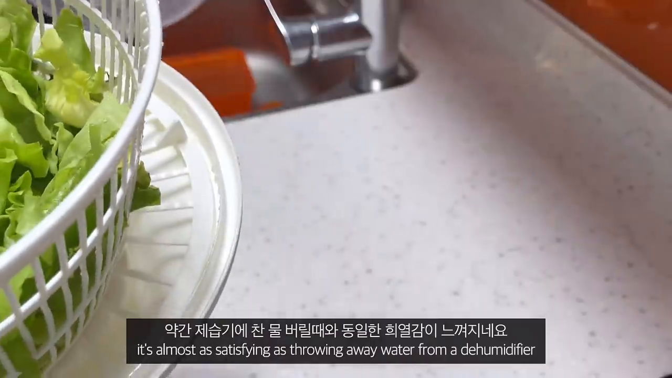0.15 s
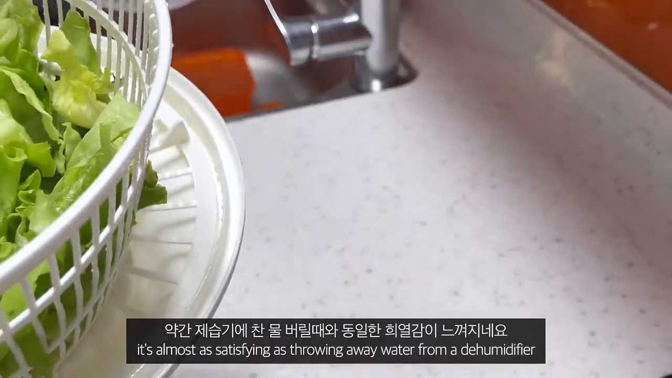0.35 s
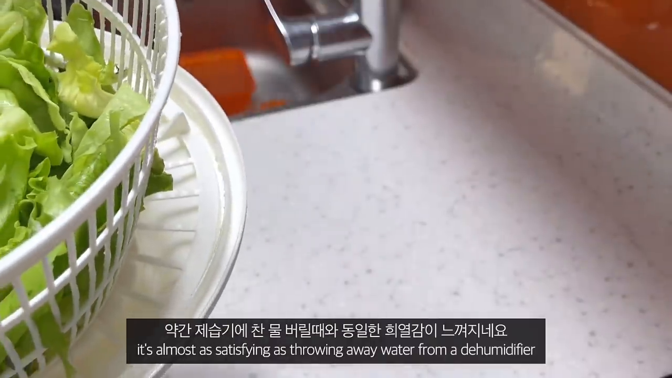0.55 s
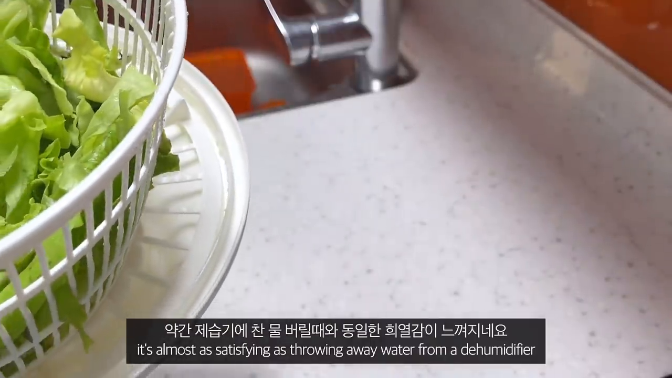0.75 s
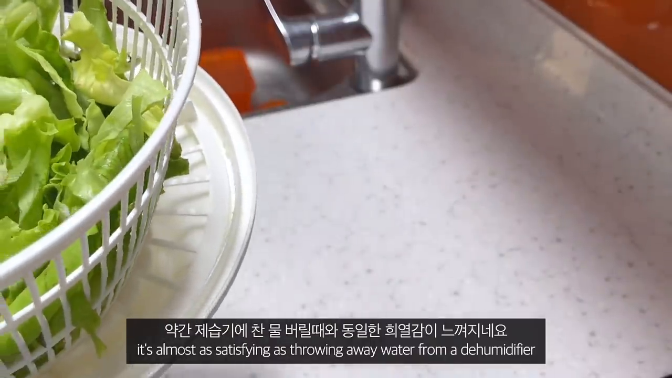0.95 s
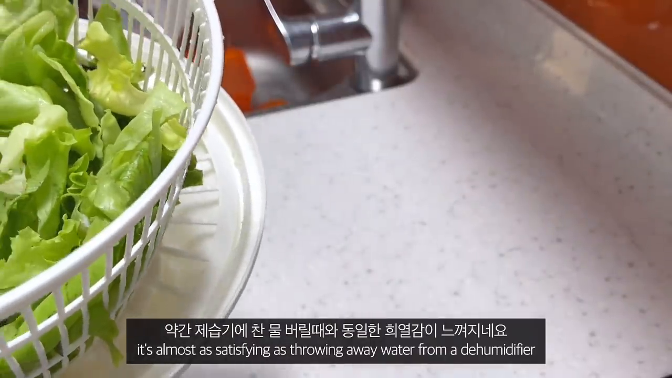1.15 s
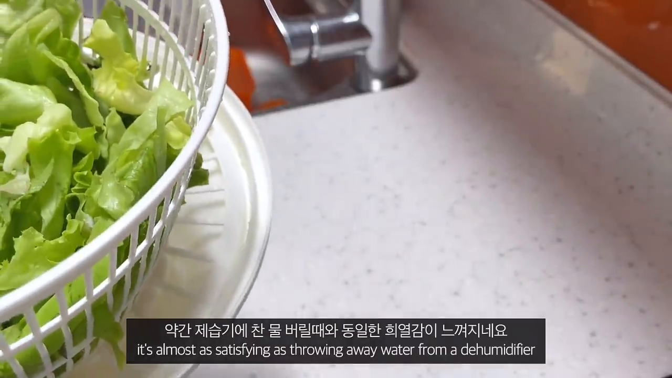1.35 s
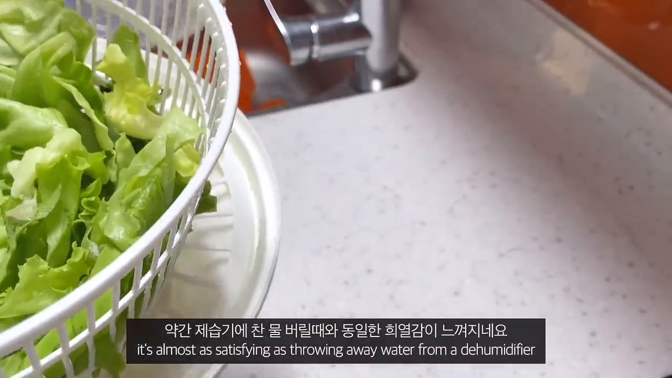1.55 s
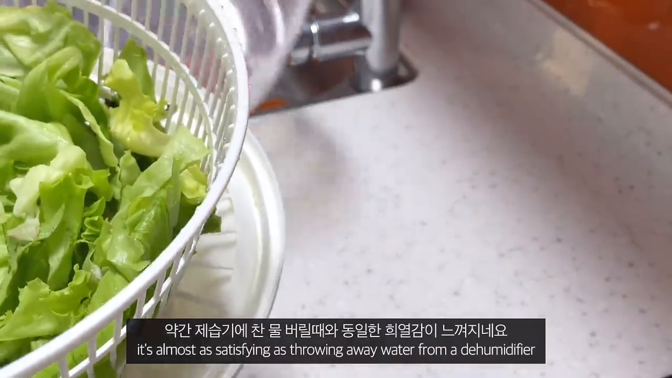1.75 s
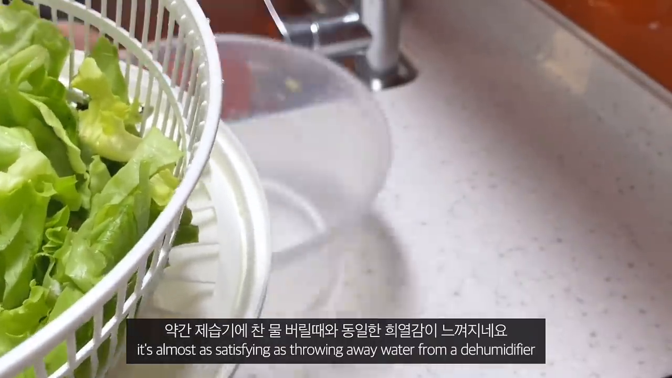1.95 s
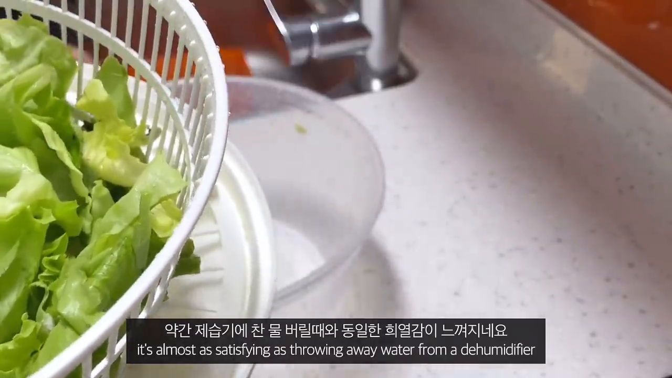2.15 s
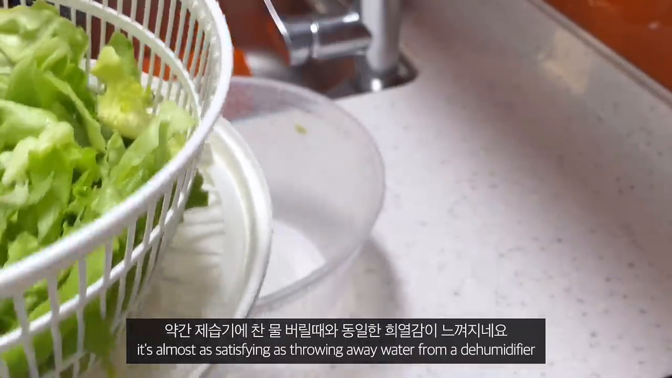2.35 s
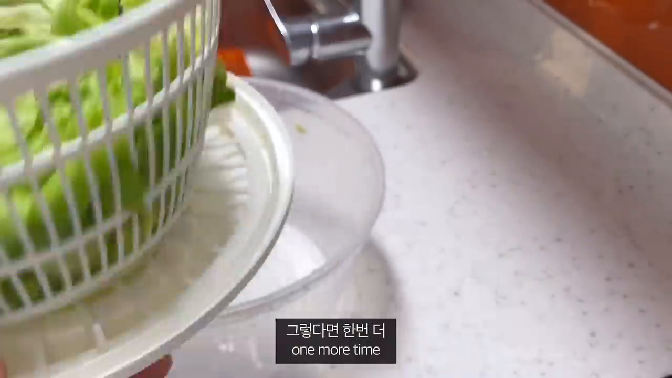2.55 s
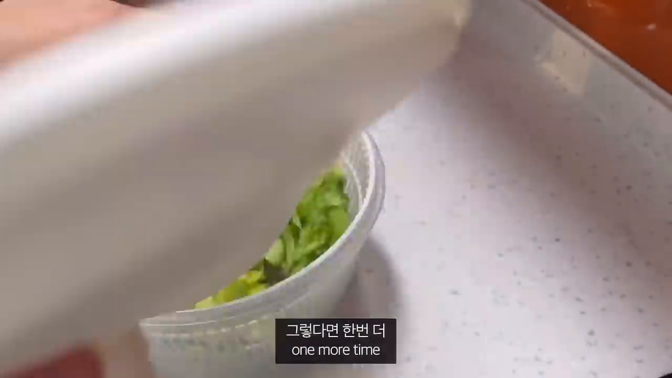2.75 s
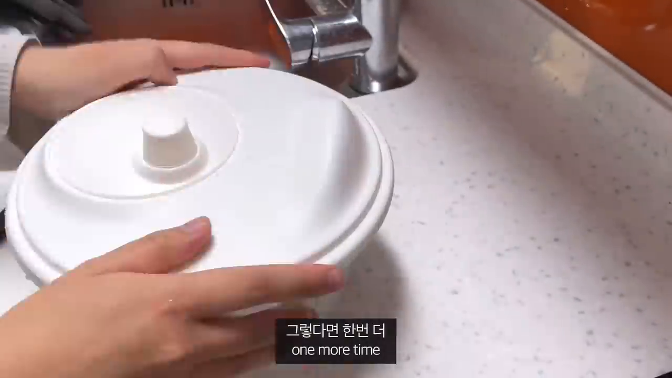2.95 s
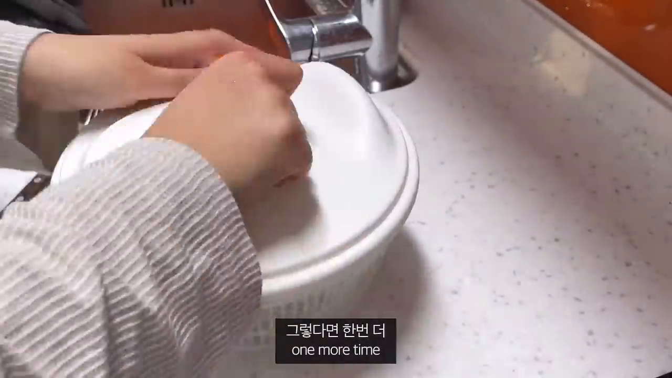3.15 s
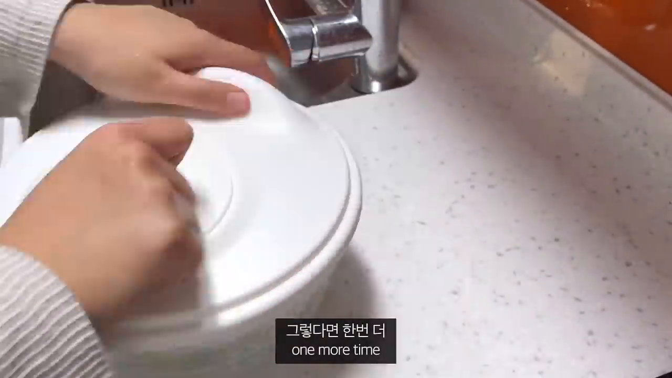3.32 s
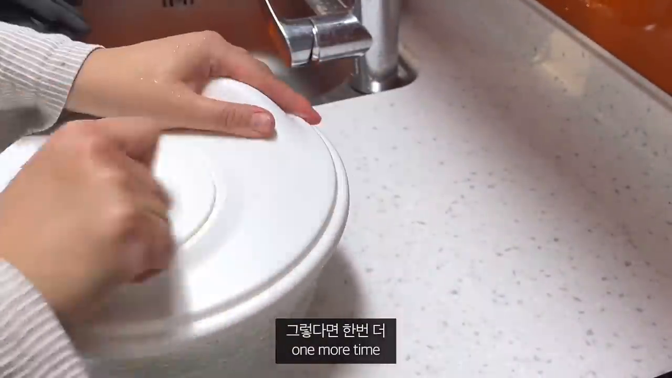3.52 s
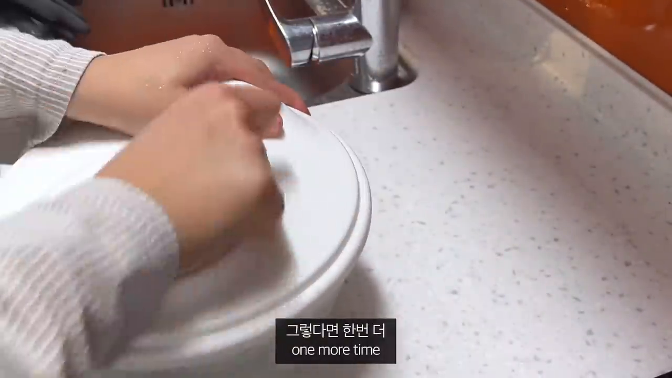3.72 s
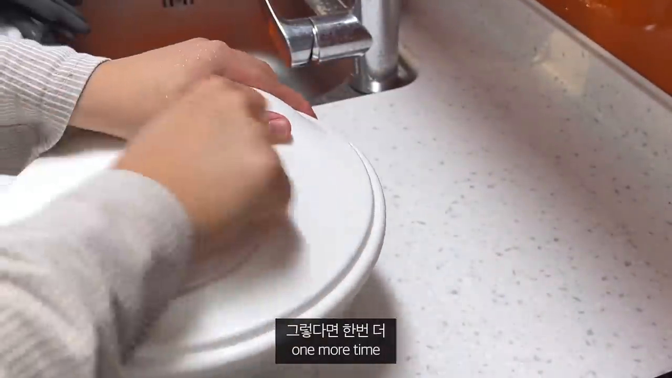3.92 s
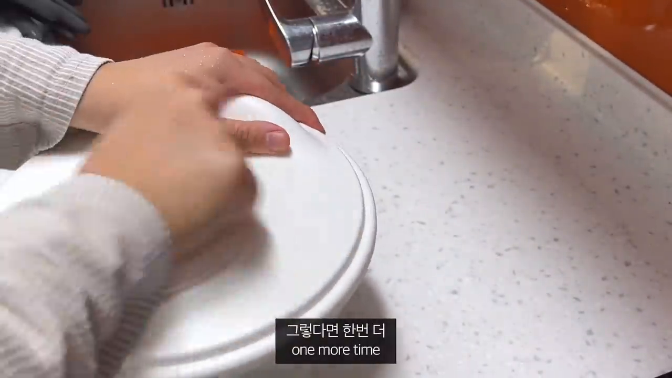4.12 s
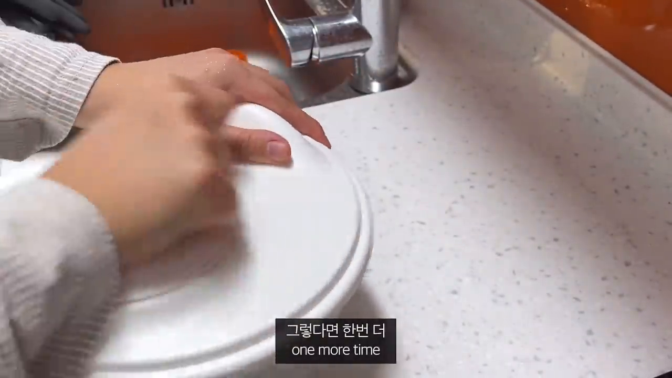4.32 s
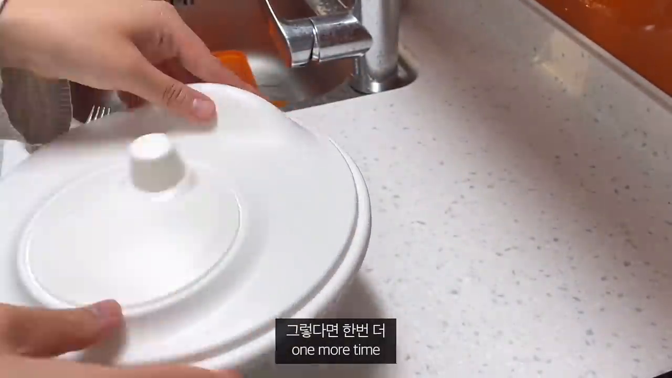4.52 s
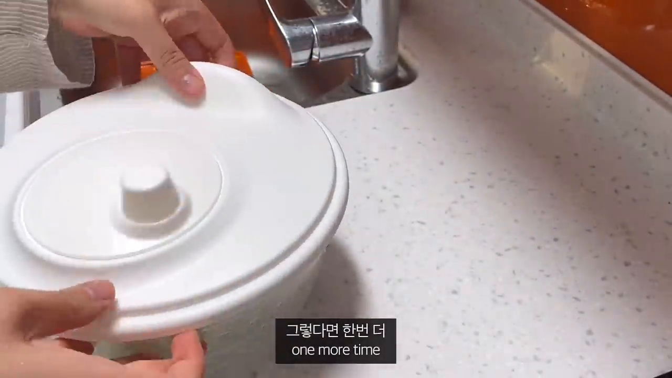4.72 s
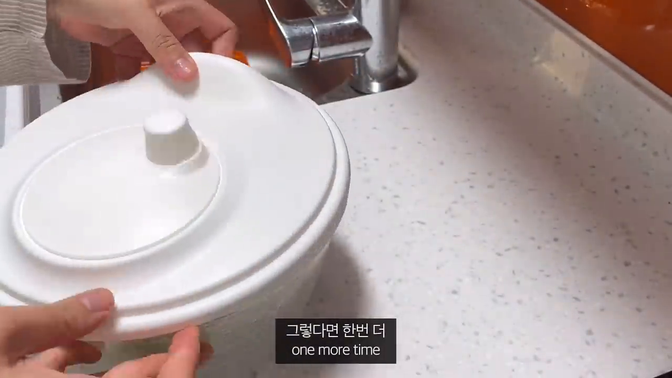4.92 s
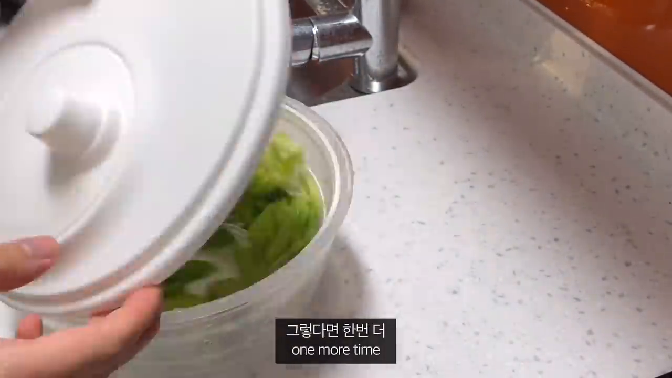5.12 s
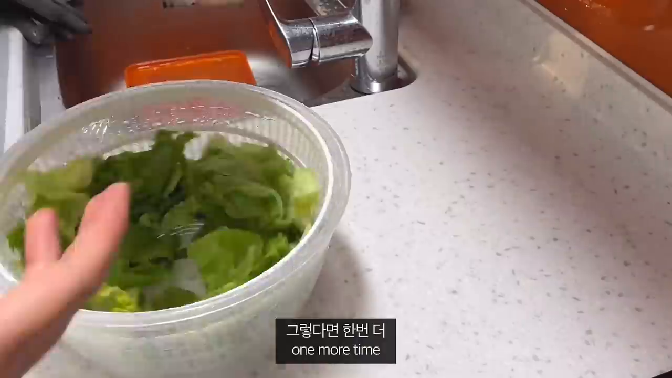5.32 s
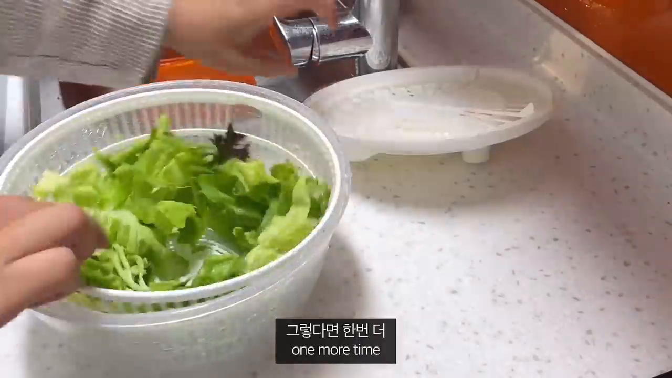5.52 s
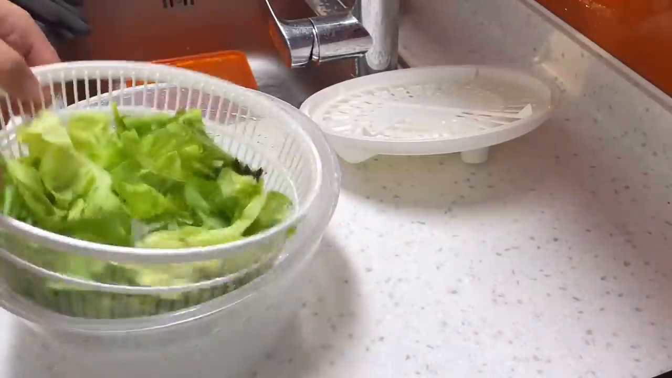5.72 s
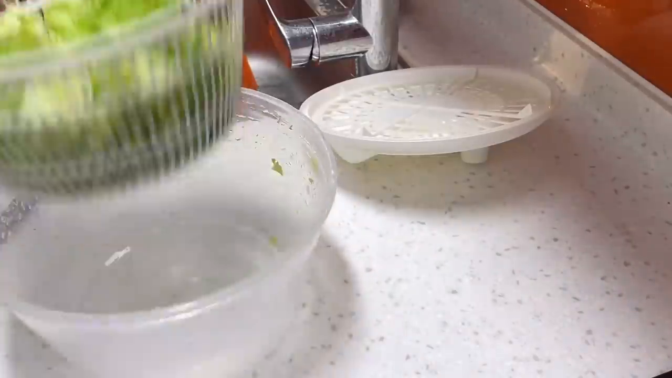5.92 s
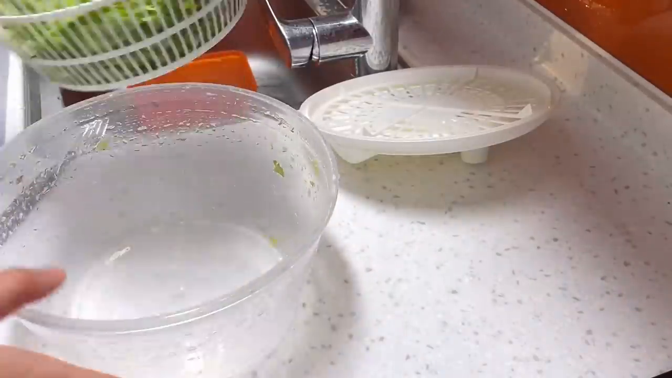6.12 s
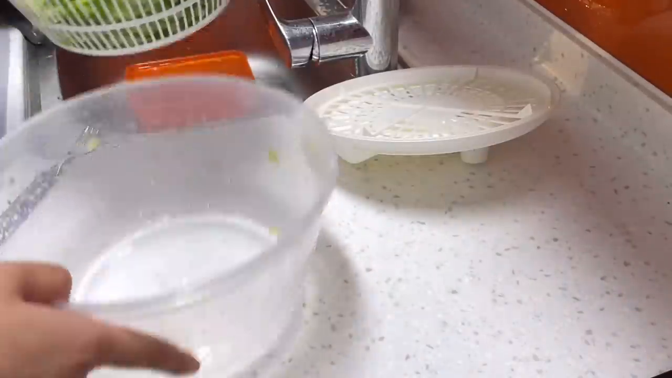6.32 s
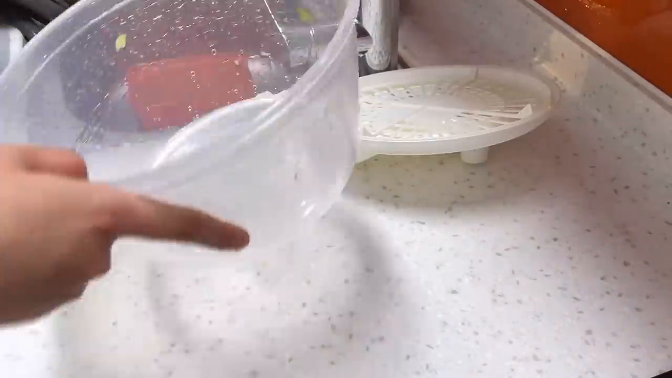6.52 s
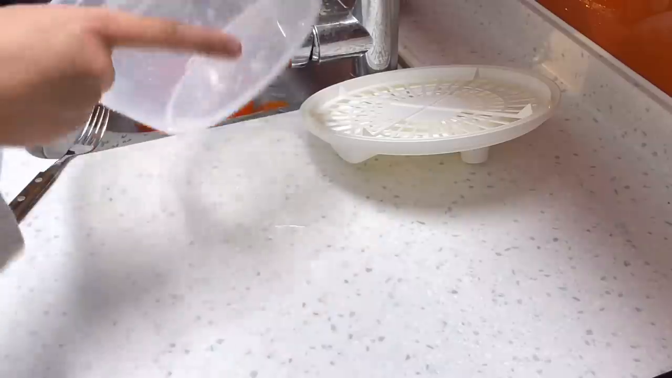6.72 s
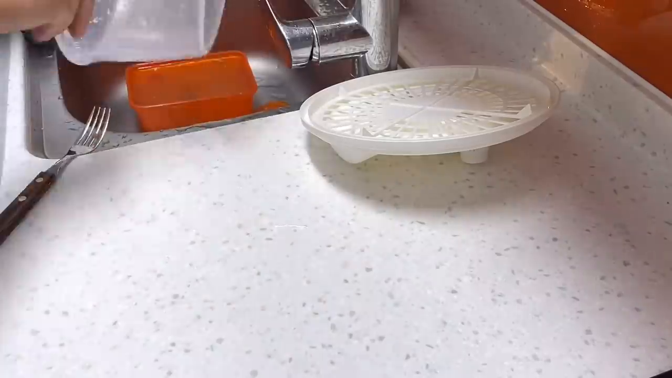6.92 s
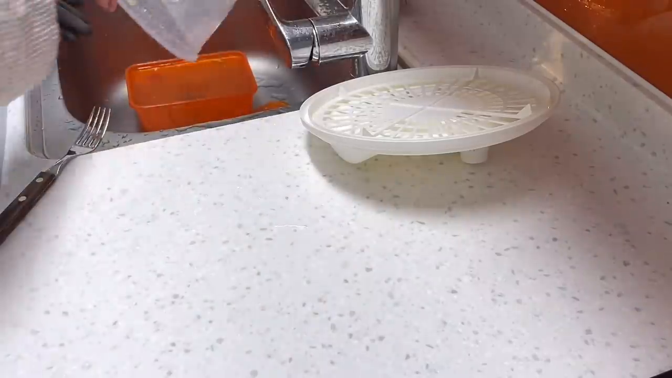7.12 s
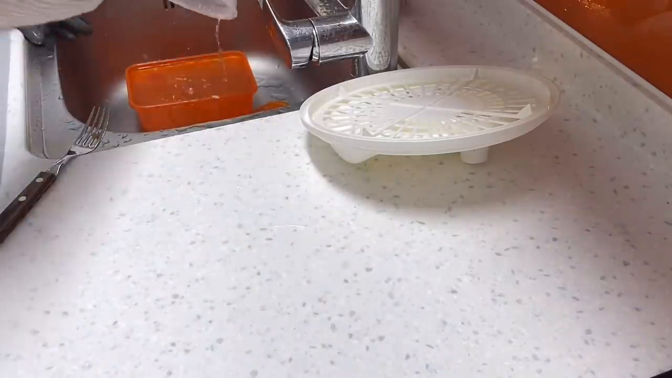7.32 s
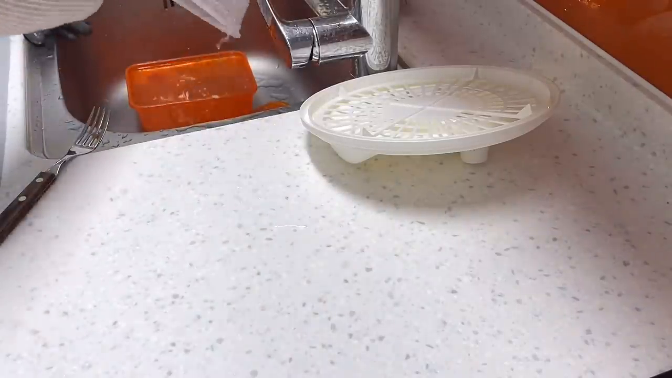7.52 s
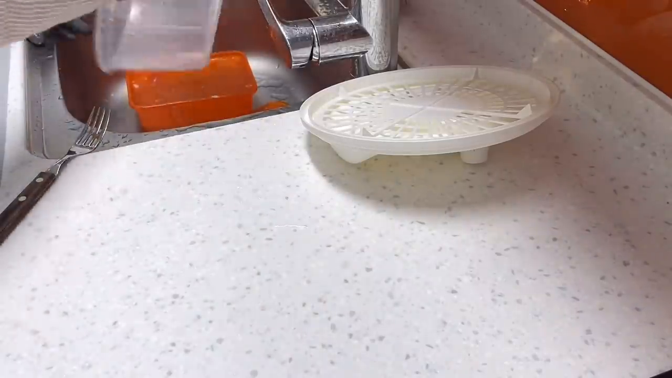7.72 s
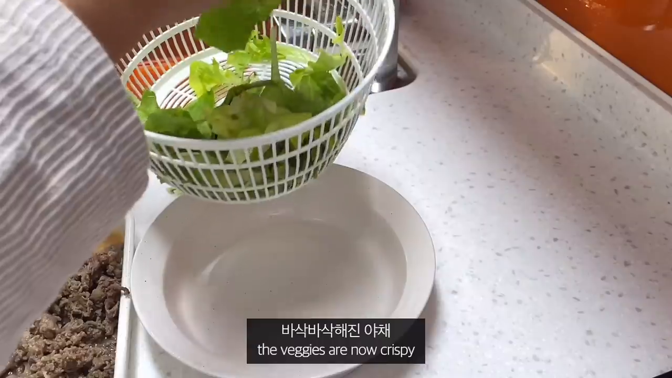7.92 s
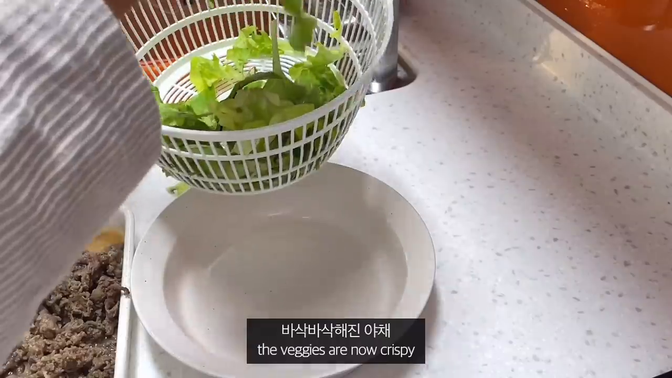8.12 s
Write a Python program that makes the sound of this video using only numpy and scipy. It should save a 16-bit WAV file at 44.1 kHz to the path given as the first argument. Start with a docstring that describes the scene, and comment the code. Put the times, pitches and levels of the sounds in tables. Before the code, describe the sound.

Close stereo pickup at a kitchen counter: a thin pour breaks into single drops in a metal sink, then a hollow plastic bowl is set down heavily. A sped-up flurry of dry plastic clacks leads into quick ratcheting crank surges, with scraping and spray hiss slowing into fine rattles. The lid comes off with light clicks, leaves rustle faintly, the bowl bumps, and a little water spatters. Faint appliance hum throughout, higher during the fast part.

```python
"""Salad spinner at the sink

Water patters into a steel sink as noise grains and ringing bubbles; a plastic bowl lands as decaying modes.
In a fast-motion passage lid parts clack as noise bursts, and the crank drives the gears in surges, as tooth
impacts that excite the lid's resonances. The basket rubs, coasts and rattles, as noise that follows its speed.
Back at normal speed the bowl is emptied once more. Appliance hum and air noise last throughout, higher in
fast motion."""
import sys
import numpy as np
from scipy import signal
from scipy.fft import rfft, irfft, next_fast_len
from scipy.io import wavfile
from scipy.ndimage import uniform_filter1d, map_coordinates

SR = 44100
rng = np.random.default_rng(int(sys.argv[2]) if len(sys.argv) > 2 else 0)


def file_out(sig):
    """Save sig as 16-bit WAV at sys.argv[1]."""
    # one column per channel
    cols = np.atleast_2d(sig).T
    # limit, then scale
    lim = np.clip(cols, -1, 1)
    pcm = np.round(lim * 32767).astype(np.int16)
    wavfile.write(sys.argv[1], SR, pcm)


N = 360293
TIME = np.arange(N) / SR
FAST_FROM, FAST_TO = 2.535, 5.632  # fast-motion passage (s)

# Crank surges. Each row: start in seconds, length in seconds, level in dB, relative whine level in dB.
CRANK_SURGES = [(3.464, 0.055, -26.7, -15), (3.566, 0.037, -22.5, -6), (3.64, .035, -20.5, -7),
                (3.713, .038, -20.5, -3), (3.772, 0.044, -19, -4), (3.845, 0.031, -19, -3),
                (3.912, 0.033, -19, -4.5), (3.979, 0.037, -19, -3), (4.036, 0.03, -20, 3.5),
                (4.075, .009, -22.5, -1.5), (4.113, 0.027, -18.5, -0.5), (4.181, 0.035, -19, -1),
                (4.242, 0.042, -18, -4.5), (4.331, 0.034, -22.5, -3.5)]
# Resonances of the lid. Each row: frequency in Hz, width in Hz, relative level in dB.
LID_MODES = [(530, 21, -2), (598.4, 5.5, 1), (1460, 54, -14.5), (2014, 130, -9), (3203, 68, 0),
             (3640, 55, -4.5), (4030, 33, -12.5), (4897, 39, -8), (5480, 91, -14), (5900, 200, -14),
             (6400, 50, -21.5), (7200, 200, -20)]
# Spectrum of the tooth contact. Each row: frequency in Hz, relative level in dB per Hz.
TEETH_SPECTRUM = [(100, -50), (217, -12.5), (589, -19), (662, -9.5), (923, -30.5), (1360, -11.5),
                  (1790, -11), (2020, -14), (2270, -16.5), (3220, -11), (4490, -16.5), (5910, -13.5),
                  (16000, -35.5)]
# Spectrum of struck plastic. Each row: frequency in Hz, relative level in dB per Hz.
PLASTIC_SPECTRUM = [(100, -68.5), (300, -8), (900, -5.5), (1700, -2), (3200, -3), (5500, -9), (9000, -18.5),
                    (16000, -31.5)]
# Lid ring that slides down through each surge. Each row: share of the surge at which it peaks,
# half width as a share, frequency in Hz before the slide, width in Hz, relative level in dB.
SLIDING_RINGS = [(.35, 0.18, 3350, 140, -6.5), (0.29, 0.25, 2100, 120, -10.5), (0.69, .2, 3560, 110, -11.5)]
# Overtones of the gear whine. Each row: multiple of the tooth rate, relative level in dB.
WHINE_OVERTONES = [(1, -1), (2, -9.5), (3, -8.5)]


def gears(end_hz=662, sag=.075, jitter=0.016, rise=.004, fall=0.0037, smear_s=.005, buzz_db=-12.0,
          rasp_db=-6, whine_db=-2, whine_fall=.006, slip_db=-2, glide=.15):
    """Periodic impact excitation: loaded gear teeth catch, buzz through the lid's modes and slow under load."""
    progress, pace, whine_gain, lag = np.zeros(N), np.ones(N), np.zeros(N), np.zeros(N)
    slips = []
    for s, length, db, surge_whine_db in CRANK_SURGES:
        now = TIME > s - rise
        a, b, c, d = rng.uniform(-1, 1, 4)
        progress[now] = np.clip((TIME[now] - s) / length, 0, 1)
        pace[now], lag[now], whine_gain[now] = 1 + .025 * a, .22 * b, amp(surge_whine_db)
        # the teeth catch with a click, and slip twice more along the way
        slips += [(s + length * at, .001, db + slip_db) for at in (0, .35 + .15 * c, .75 + .15 * d)]
    early = 1 - progress
    pushes = [row[:3] for row in CRANK_SURGES]

    # the tooth rate (Hz) sags through each surge towards end_hz; turns counts the teeth passed
    tooth_hz = end_hz * pace * (1 + sag * early ** 2) * (1 + jitter * wobble(260))
    turns = np.cumsum(tooth_hz) / SR
    impacts = unit(np.diff(np.floor(turns), prepend=0) * amp(3 * rng.standard_normal(N)))

    # every tooth gives a click and a short scrape; the thin lid smears the click, treble first
    dispersion = lambda f: np.exp(-2j * np.pi * smear_s * np.sqrt(1000 * f))  # delay is smear_s / 2 at 1 kHz
    scrape = unit(np.exp(-(turns % 1) / 0.5) * rng.standard_normal((2, N)))
    clicks = filtered(impacts - impacts.mean(), dispersion)
    rasp = stereo(scrape + [[.7], [0]] * clicks, TEETH_SPECTRUM)

    # the contact travels round the lid, so its modes take turns
    shell = lambda modes: filtered(clicks + .5 * scrape, lambda f: resonances(modes, f))
    mode_groups = np.array_split(np.array(LID_MODES), 6)
    buzz = unit(sum(amp(4.5 * wobble(60)) * shell(modes) for modes in mode_groups))

    slide = (1 + glide * (early - .5)) * pace ** 2
    blooms = np.zeros(N)
    for at, span, hz, width, db in SLIDING_RINGS:
        uneven = amp(3 * wobble(14))  # no two turns ring alike
        swell = np.exp(-((progress - at - lag) / span) ** 2)
        blooms += amp(db) * uneven * swell * moving_ring(hz * slide, width)

    # the bite is harsh at first and turns rounder as the teeth settle
    grip = amp(2.2 * wobble(150))
    bite = amp(buzz_db) * buzz + amp(rasp_db + 2 * early) * grip * rasp + blooms

    tone = np.zeros(N)
    for k, db in WHINE_OVERTONES:
        tone += amp(db + 2.5 * wobble(90)) * np.sqrt(2) * np.sin(2 * np.pi * round(k) * turns)
    whine = whine_gain * amp(whine_db - 14 * early) * tone  # it grows through each surge
    catch = strokes(slips, rise=0.0003, fall=0.0025) * noise(PLASTIC_SPECTRUM)
    return strokes(pushes, rise, fall) * bite + strokes(pushes, rise, whine_fall) * whine + catch


SPIN_UP_S, COAST_FROM, STOP_AT = 0.017, 4.045, 5.01  # run-up time constant; steady slowing to rest (s)


def basket_speed():
    """Rotational inertia and friction: share of full speed in a quick run-up, then an even slowing to rest."""
    run_up = 1 - np.exp(-np.maximum(TIME - CRANK_SURGES[0][0], 0) / SPIN_UP_S)
    return run_up * np.clip((STOP_AT - TIME) / (STOP_AT - COAST_FROM), 0, 1)


RUB_DB, HISS_DB, COAST_HISS_DB = -30, -36.5, -1  # at full speed; less spray flies once the crank is let go
HANDS_DB, HANDS_HISS_DB = -58.5, -65  # hands shifting on the wet plastic
# Plastic and leaves sliding on plastic. Each row: start in seconds, length in seconds, relative level in dB.
PLASTIC_SLIDES = [(2.83, 0.044, -31), (3.13, 0.18, -44.5), (3.33, 0.14, -39), (5.436, 0.016, -37),
                  (5.51, 0.048, -46)]
# Spectrum of the rubbing basket. Each row: frequency in Hz, relative level in dB per Hz.
RUB_SPECTRUM = [(120, -49), (217, -13.5), (516, -4.5), (602, -8), (670, 2.5), (941, -14), (1520, -10.5),
                (2200, -14.5), (6000, -23.5), (9000, -70)]
# Bright spectrum of spray and sharp edges. Each row: frequency in Hz, relative level in dB per Hz.
SPRAY_SPECTRUM = [(2500, -6.5), (5000, -4), (9000, -6.5), (15500, -13.5)]


def basket(slide_hiss_db=-10, coast_rub_db=2):
    """Sliding friction: the basket's scrape and flung droplets follow its speed; hands and lid slide too."""
    speed, hands = basket_speed(), fast_motion()
    slides = strokes(PLASTIC_SLIDES, rise=0.015, fall=0.025)
    coasting = np.clip((TIME - COAST_FROM) / 0.067 + 1, 0, 1)
    rub = amp(RUB_DB + coast_rub_db * coasting) * speed + amp(HANDS_DB) * hands + slides
    spray_hiss = amp(HISS_DB + COAST_HISS_DB * coasting) * speed
    hiss = spray_hiss + amp(HANDS_HISS_DB) * hands + amp(slide_hiss_db) * slides
    # the ribs jolt against the bowl
    sway = amp(1.2 * wobble(35)) * chatter(rate=240, decay=.002, steady=1.1)
    scrape = rub * grains(RUB_SPECTRUM, rate=2500, spread_db=1)
    spray = hiss * grains(SPRAY_SPECTRUM, rate=3000, spread_db=2)
    return sway * (scrape + spray)


# The coasting basket chatters against the bowl. Each row: start in seconds, length in seconds,
# relative level in dB, ring in Hz, edge level in dB.
BASKET_RATTLES = [(4.387, 0.0067, -26, 1136, -4.5), (4.434, 0.013, -30, 1677, -5),
                  (4.464, 0.011, -31, 1487, -5), (4.495, 0.009, -28, 850, -4.5),
                  (4.532, 0.0054, -31.5, 1690, -6), (4.545, 0.0062, -30.5, 1400, -7.5),
                  (4.604, 0.012, -32, 1490, 0), (4.638, .005, -34.5, 800, -8),
                  (4.651, .008, -33, 1700, -9.5), (4.7, .007, -32.5, 1490, -4.5),
                  (4.714, 0.0055, -32.5, 1540, -6), (4.77, 0.017, -38.5, 1100, -9.5),
                  (4.822, 0.018, -33.5, 900, -9), (4.872, 0.01, -37, 1000, -18),
                  (4.908, 0.0046, -30.5, 990, -15), (4.923, 0.0033, -28.5, 1090, -7.5)]
# Spectrum of the grazed rim. Each row: frequency in Hz, relative level in dB per Hz.
RIM_SPECTRUM = [(500, -22.5), (950, 5.5), (1300, -6), (1800, -0.5), (3500, -45), (12000, -50)]


def rattles(rise=0.0022, fall=0.0095, ring_db=-4.0, rim_db=-4.5, body_db=-7):
    """Intermittent contact: the coasting basket grazes the bowl in short bursts, each ringing at its own spot."""
    out, t = np.zeros((2, N)), np.arange(SR // 10) / SR
    for s, length, db, hz, edge_db in BASKET_RATTLES:
        touch = np.clip(t / rise, 0, 1) * np.exp(-np.maximum(t - length + fall / 2, 0) / fall)
        spot = amp(ring_db) * ring(hz, width=0.076, size=len(t))
        rim = amp(rim_db) * noise(RIM_SPECTRUM, size=len(t))
        body = amp(body_db) * ring(670, width=0.091, size=len(t))
        edge = amp(edge_db) * noise(PLASTIC_SPECTRUM, size=len(t))
        add(out, s, amp(db) * touch * (spot + rim + body + edge))
    return out * amp(2.5 * wobble(220))


# Lid and basket clacks. Each row: contact in seconds, relative level in dB, edge level in dB, ring in Hz.
LID_CLACKS = [(2.7004, -17.5, -1.5, 2950), (2.7338, -10, -3.5, 3080), (2.803, -22.5, 1.5, 2270),
              (2.826, -1.5, -7, 1780), (2.842, -9.5, -5, 1788), (2.853, -9, -7, 1700),
              (2.862, -10, -7.5, 1550), (2.8705, -4, -7, 1544), (2.879, -8, -7.5, 1060),
              (2.9178, -12, -9, 1080), (2.928, -13, -19.5, 1078), (2.9429, -8.5, -0.5, 1507),
              (2.946, -4.5, -3.5, 1065), (2.954, -14, -6.5, 1573), (3.0133, -9.5, -12, 1671),
              (3.056, -19.5, -17.5, 1660), (3.0998, -1, -18.5, 1550), (3.2805, -19, -10, 2000),
              (3.3484, -22.5, -9, 3550), (3.3857, -24, -20.5, 830), (3.81, -10.5, -8, 4960),
              (4.169, -17, -9, 1446), (4.3279, -7.5, -10.5, 1548), (5.1398, -8.5, -4, 3360),
              (5.1446, -11, -12.5, 1670), (5.437, -13.5, 6.5, 1460), (5.4939, -15.5, -1, 4570),
              (5.5023, -8, 3.5, 4080), (5.524, -20, -1, 1590), (5.537, -23, -5.5, 1501)]


def clacks(snap_t60=0.018, edge_t60=0.018, attack=0.0012, lead=0.0035, spot_db=-5.5, shell_db=2):
    """Impact of thin shells: parts graze and meet in a dry snap, a ringing spot and lid, and a sharp rim edge."""
    out, clock = np.zeros((2, N)), np.arange(-SR // 100, SR // 8) / SR  # seconds from contact
    t, size = np.maximum(clock, 0), len(clock)
    onset = 1 - np.exp(-t / attack)
    graze = amp(-26.0) * np.exp(-np.abs(clock) / lead)
    for s, db, edge_db, hz in LID_CLACKS:
        spot = amp(spot_db) * ring(hz, width=.16, size=size) * fade(t, .026)
        snap = amp(-5.5) * noise(PLASTIC_SPECTRUM, size=size) * fade(t, snap_t60) + spot
        edge = amp(edge_db) * noise(SPRAY_SPECTRUM, size=size) * fade(t, edge_t60)
        strike = onset * noise(PLASTIC_SPECTRUM, size=size) * fade(t, .011)
        shell = amp(shell_db) * filtered(strike, lambda f: resonances(LID_MODES, f))
        hit = (onset + graze) * (snap + edge) + shell
        add(out, s + clock[0], amp(db) * hit)
    return out


# The hollow spinner bumps on the counter. Each row: start in seconds, relative level in dB, favoured Hz.
SPINNER_BUMPS = [(2.737, -29.5, 282), (2.872, -18, 587), (2.921, -25.5, 480), (2.946, -11, 500.4),
                 (3.014, -15.5, 540), (3.058, -30, 300), (3.1007, -3.5, 469.7), (3.3857, -20, 610),
                 (4.3285, -14.5, 347.2), (5.1435, -16, 500), (5.503, -21.5, 680)]
# Modes of the closed spinner. Each row: mean frequency in Hz, relative level in dB, t60 in seconds,
# radians by which the left leads.
HOLLOW_MODES = [(312, -6, 0.11, 0.38), (490, -6, 0.055, 0.36), (666, 4, 0.026, .2)]


def bumps(reach_octaves=.7, attack=0.001, thump_db=-13, thump_t60=0.056):
    """Modal excitation: each bump thumps dully and rings the hollow body's modes that lie near its pitch."""
    out, t = np.zeros((2, N)), np.arange(SR // 5) / SR
    sides = np.array([[.5], [-.5]])
    for s, db, hz in SPINNER_BUMPS:
        body = np.zeros((2, len(t)))
        for f, level, t60, lead in HOLLOW_MODES:
            nearness = np.exp(-(np.log2(f / hz) / reach_octaves) ** 2 / 2)
            tone = np.sin(2 * np.pi * f * rng.normal(1, .012) * t + sides * lead)
            body += amp(level) * nearness * tone * fade(t, t60)
        thump = amp(thump_db) * ring(hz, width=.3, size=len(t)) * fade(t, thump_t60)
        add(out, s, amp(db) * (body + thump) * (1 - np.exp(-t / attack)))
    return out


TICK_PER_S, TICK_DB = 14, -34.5  # lighter touches in between, relative level
# The firmest finger ticks on the wet plastic. Each row: start in seconds, relative level in dB.
FINGER_TICKS = [(5.065, -32.5), (5.132, -15.5), (5.183, -31), (5.298, -32.5), (5.445, -16), (5.593, -26.5)]


def ticks(t60=0.02):
    """Weak impact: light, bright touches too slight to ring the shell."""
    out, t = np.zeros((2, N)), np.arange(SR // 20) / SR
    light = [(s, TICK_DB + 4 * a) for s, a, _ in scattered(FAST_FROM, FAST_TO, TICK_PER_S)]
    for s, db in FINGER_TICKS + light:
        touch = noise(SPRAY_SPECTRUM, size=len(t)) * fade(t, t60) * (1 - np.exp(-t / 0.00087))
        add(out, s, amp(db - 4.0) * touch)
    return out


# The bowl, or a slug of water, meets counter and sink. Each row: start in seconds, relative level in dB,
# counter boom in dB, flexing base in dB, its pitch in Hz, edge in dB, all three relative.
BOWL_THUDS = [(0.672, -20, -5.5, 6, 267, -21.5), (1.993, 0, -17, -19, 230, -35.5),
              (2.013, -9, -10, -13, 234, -49), (2.109, -21, -16, 1, 430, -55),
              (2.414, -32, -20, -18, 300, -20), (2.438, -34.5, -18, -27, 300, -27),
              (5.654, -36.5, 2.5, 0.5, 265, -30), (5.839, -30, -5.5, -0.5, 265, -23),
              (5.9126, -14.5, -15.5, -0.5, 331, -41), (7.254, -29, -4, -24, 269, 2)]
# Modes of the bowl and counter. Each row: mean frequency in Hz, mean relative level in dB, t60 in seconds.
BOWL_MODES = [(92, -8, 0.13), (154.5, 1.5, 0.34), (699.5, 8.5, 0.027), (710, -4, 0.11), (779, -15.5, 0.047),
              (1298, -8, 0.039), (1610, -25.5, 0.1), (2102, -15.5, 0.13), (2330, -20, 0.13)]
# Spectrum of the dull knock. Each row: frequency in Hz, relative level in dB per Hz.
KNOCK_SPECTRUM = [(88, -48.5), (160, -7), (370, -13.5), (680, -3), (1030, -14), (1300, -8), (1500, -14),
                  (2370, -21.5), (6340, -50), (9000, -81.5)]


def thuds(knock_t60=0.08, edge_t60=0.076, flex_t60=0.13, boom_t60=0.26, boom_rise=0.0063, boom_below_hz=220):
    """Coupled modal decay: the bowl's wall rings briefly, its base flexes and the counter booms beneath it."""
    out, t = np.zeros((2, N)), np.arange(SR * 3 // 4) / SR
    boom_spectrum = [(20, -32.5), (35, -11.0), (70, 3), (200, -6), (350, -21.0), (900, -60.0)]
    edge_spectrum = [(1500, -23.5), (5000, -0.5), (7000, -2.0), (9000, -27.0), (13000, -11.0), (16000, -38.0)]
    for s, db, boom_db, flex_db, flex_hz, edge_db in BOWL_THUDS:
        modes = []
        for hz, level, t60 in BOWL_MODES:
            gain = amp(level + rng.normal(0, 0.65))
            tone = np.sin(2 * np.pi * hz * rng.normal(1, 0.0059) * t)
            modes.append((hz, gain * tone * fade(t, t60)))
        wall = amp(-16.0) * sum(mode for hz, mode in modes if hz > boom_below_hz)
        counter = sum(mode for hz, mode in modes if hz <= boom_below_hz)
        counter = counter + amp(-1.0) * noise(boom_spectrum, size=len(t)) * fade(t, boom_t60)
        boom = amp(boom_db) * counter * (1 - np.exp(-t / boom_rise)) ** 2
        knock = amp(-10.0) * noise(KNOCK_SPECTRUM, size=len(t)) * fade(t, knock_t60)
        crack = amp(-14.5) * ring(1500, width=.5, size=len(t)) * fade(t, 0.013)
        flex = amp(flex_db - 7.5) * ring(flex_hz, width=0.54, size=len(t)) * fade(t, flex_t60)
        flex = flex * (1 - np.exp(-t / 0.0023))
        edge = amp(edge_db) * noise(edge_spectrum, size=len(t)) * fade(t, edge_t60)
        contact = 1 - np.exp(-(t / .0007) ** 2)  # soft plastic takes a moment to bite
        add(out, s, amp(db) * contact * (wall + knock + crack + flex + edge + boom))
    return out


POUR_RISE_S, POUR_FALL_S = 0.0076, 0.0056
GURGLE_AT, GURGLE_WIDTH_S, GURGLE_DB = 1.12, 0.37, -56.5  # water gathers at the drain (s, s, dB)
# Swells of water leaving the tilted bowl. Each row: start in seconds, length in seconds, relative level in dB.
POUR_SWELLS = [(.27, 0.44, -48), (.271, 0.022, -47.5), (.343, 0.0068, -45), (.44, 0.026, -42),
               (.495, 0.059, -50), (.573, 0.067, -45.5), (1.16, 0.024, -47.5), (7.25, 0.0099, -37.5)]
# The last water dribbles off the rim. Each row: start in seconds, length in seconds, relative level in dB,
# typical drop pitch in Hz.
RIM_DRIBBLES = [(.92, 0.45, -61.5, 2640), (1.476, 0.2, -62.5, 3010), (2.15, 0.38, -63.5, 3300),
                (7.291, 0.45, -65.5, 1585)]
# The loudest drops. Each row: start in seconds, relative level in dB, initial pitch of the trapped bubble in Hz,
# relative splash level in dB.
LOUD_DROPS = [(.274, -36, 910, -4), (.348, -40.5, 1330, 0), (.445, -30.5, 3680, -4.5),
              (.516, -37, 3300, -7.5), (.575, -31.5, 3360, -7), (0.59, -35.5, 4030, -4.5),
              (.607, -38, 1350, -5.5), (0.783, -33, 1250, -8), (0.825, -50.5, 6950, -1.5),
              (.936, -49, 4050, 0.5), (.984, -39, 900, -9), (1.147, -35, 3100, -4),
              (1.16, -39.5, 11800, -8.5), (1.177, -40.5, 3280, -4.5), (1.204, -43.5, 6700, -11.5),
              (1.286, -37.5, 1630, -6), (1.313, -41, 1190, -16), (1.337, -43.5, 2050, -8.5),
              (1.394, -34, 3230, -15), (1.48, -40, 1980, -12), (1.595, -44.5, 4820, -1),
              (1.953, -41, 3240, -8), (2.201, -38.5, 2950, -16), (2.301, -44.5, 3490, -7.5),
              (2.378, -43, 11700, -11), (7.259, -27, 5180, -3.5), (7.277, -40, 2210, -4.5),
              (7.296, -31, 1376, -9), (7.396, -42, 1930, -2), (7.418, -42, 4780, -5.5),
              (7.501, -40.5, 2140, -1), (7.64, -45.5, 1334, -5.5), (7.709, -51, 4450, -17.5)]
# Spectrum of water striking steel. Each row: frequency in Hz, relative level in dB per Hz.
SPLASH_SPECTRUM = [(180, -27.5), (300, -1), (587, 0.5), (1020, -7), (1350, -9), (1880, -11.5), (6510, -9.5),
                   (7920, -22), (10800, -8), (15000, -29)]


def water(bubble_t60=0.047, rise=.5, dribble_patter_db=-2, bubble_db=-6, splat_db=-7.0, splat_t60=0.098):
    """Bubble resonance and droplet impact: a thin stream patters on steel, fizzes, gurgles and breaks into drops."""
    stream = strokes(POUR_SWELLS, POUR_RISE_S, POUR_FALL_S)
    dribble = strokes([row[:3] for row in RIM_DRIBBLES], rise=0.032, fall=.03)
    spurts = amp(1.2 * wobble(50) + 1 * wobble(18))
    dribble = dribble * amp(2 * wobble(16))  # it comes in uneven runs
    spatter = chatter(rate=45, decay=.014, steady=.9)  # single drops strike the steel
    flow = amp(-4) * stream * spurts + amp(dribble_patter_db) * dribble * spatter
    patter = flow * grains(SPLASH_SPECTRUM, rate=9000, spread_db=3)
    fizz = amp(-8.0) * stream * spurts * bubbles(rate=830, centre_hz=3460, spread=0.58, cycles=30)

    # a thin dribble traps fewer bubbles
    plinks = np.zeros((2, N))
    for s, length, db, hz in RIM_DRIBBLES:
        run = strokes([(s, length, db)], rise=.03, fall=.03)
        plinks += amp(-3) * run * bubbles(rate=250, centre_hz=hz, spread=.45, cycles=13)

    swell = np.exp(-((TIME - GURGLE_AT) / GURGLE_WIDTH_S) ** 2)
    gurgle = amp(GURGLE_DB) * swell * bubbles(rate=350, centre_hz=1137, spread=0.51, cycles=23)

    drops, t = np.zeros((2, N)), np.arange(SR // 7) / SR
    for s, db, hz, splash_db in LOUD_DROPS:
        bubble = np.sin(2 * np.pi * hz * t * (1 + rise * t)) * fade(t, bubble_t60)  # its pitch rises
        sink_ring = amp(-4) * ring(hz, width=0.13, size=len(t))
        splash = amp(splash_db) * noise(SPLASH_SPECTRUM, size=len(t))
        splat = (sink_ring + splash) * fade(t, splat_t60)
        drop = amp(bubble_db) * bubble + amp(splat_db) * splat
        add(drops, s, amp(db) * drop * (1 - np.exp(-t / .0012)))
    return patter + fizz + plinks + gurgle + drops


# Lettuce shifting in the lifted basket. Each row: start in seconds, length in seconds, level in dB.
LEAF_RUSTLES = [(5.69, 0.058, -57), (6.195, .03, -57), (7.965, 0.038, -69.5), (8.035, 0.15, -71)]
# Spectrum of damp leaves. Each row: frequency in Hz, relative level in dB per Hz.
LEAF_SPECTRUM = [(300, 3.5), (1900, -1), (3000, -7), (15000, -35)]


def lettuce():
    """Granular friction: damp leaves rustle softly as many tiny impacts."""
    return strokes(LEAF_RUSTLES, rise=.012, fall=.025) * grains(LEAF_SPECTRUM, rate=4000, spread_db=2)


QUIETER_FROM = 7.77  # (s)
# Appliance hum at normal speed. Each row: frequency in Hz, relative level in dB.
HUM_LINES = [(118.4, -50.5), (151.5, -51)]
# Appliance hum in fast motion. Each row: frequency in Hz, relative level in dB.
FAST_HUM_LINES = [(527.6, -47), (655, -49.5), (692, -53.5)]
# Spectrum of the room air at normal speed. Each row: frequency in Hz, relative level in dB per Hz.
AIR_SPECTRUM = [(20, -17.5), (86, -3.5), (112, -24.5), (154, -0.5), (176, -13.5), (202, -24), (293, -22),
                (558, -30), (903, -34), (1090, -42), (1540, -40.5), (2600, -45), (3600, -49.5), (8100, -60),
                (10900, -52.5), (15000, -71)]
# Spectrum of the room air in fast motion. Each row: frequency in Hz, relative level in dB per Hz.
FAST_AIR_SPECTRUM = [(70, -46), (214, -9.5), (471, -9.5), (526, -6.5), (587, -19.5), (680, -1),
                     (930, -29.5), (1790, -25.5), (2720, -30), (5480, -41), (15000, -41.5)]


def background():
    """Stationary tones and noise: appliance hum and room air, higher in fast motion and quieter at the end."""
    def hum(lines):
        """Slow random modulation makes each steady tone waver in level and phase."""
        total = np.zeros(N)
        for hz, db in lines:
            level = amp(db + 1.3 * wobble(6)) * np.sqrt(2)
            total += level * np.sin(2 * np.pi * hz * TIME + .35 * wobble(9))
        return total

    normal = amp(1) * hum(HUM_LINES) + amp(-46.5) * noise(AIR_SPECTRUM)
    hurried = amp(0.5) * hum(FAST_HUM_LINES) + amp(-48.5) * noise(FAST_AIR_SPECTRUM)
    share = fast_motion()
    quieter = amp(np.interp(TIME, [QUIETER_FROM - .01, QUIETER_FROM + 0.0046], [0, -10]))
    balance = amp([[-.8], [.8]])  # a little to the right
    return share * hurried + (1 - share) * quieter * normal * balance


def fast_motion():
    """Smoothed gating: 1 during the fast-motion passage, else 0."""
    inside = (TIME > FAST_FROM) & (TIME < FAST_TO)
    return uniform_filter1d(inside.astype(float), size=256)


# Stereo lean of the lid. Each row: frequency in Hz, left minus right in dB.
LID_LEAN = [(200, 0), (700, -3.5), (1290, 6.5), (2400, 3.5), (4400, -0.5), (8000, 2.5), (15000, 5)]


def leftward(x, share):
    """Directional radiation: level differences send most of the lid's range to the left."""
    sides = np.array([[.5], [-.5]])
    return filtered(x, lambda hz: amp(share * along(LID_LEAN, hz) * sides))


# Flat spectrum. Each row: frequency in Hz, relative level in dB per Hz.
WHITE_SPECTRUM = [(100, 0), (10000, 0)]
# Decay of the kitchen. Each row: frequency in Hz, t60 in seconds at speed 1.
KITCHEN_DECAY = [(100, 0.6), (500, 0.33), (2000, 0.33), (10000, 0.26)]


def room(x, speed):
    """Reverberation: the tiled kitchen answers as decaying noise, which dies sooner at higher speed."""
    hz, t, z = signal.stft(noise(WHITE_SPECTRUM, size=SR // 2), SR, nperseg=256)
    decay = fade(t * speed, along(KITCHEN_DECAY, hz)[:, None])
    tail = signal.istft(z * decay, SR, nperseg=256)[1]
    return signal.fftconvolve(x, tail / np.linalg.norm(tail[0]), axes=1)[:, :N]


def amp(db):
    """Logarithmic level: decibels to gain."""
    return 10 ** (np.asarray(db) / 20)


def unit(x):
    """Normalisation: scale to rms 1."""
    return x / np.sqrt(np.mean(x ** 2) + 1e-20)


def along(points, hz):
    """Logarithmic interpolation: (Hz, value) points read on a log frequency axis."""
    f, v = np.transpose(points)
    return np.interp(np.log(hz + 1), np.log(f + 1), v)


def wobble(rate):
    """Slow random modulation: a smooth curve with rate knots a second."""
    return map_coordinates(rng.standard_normal(int(N * rate / SR) + 4), [TIME * rate])


def filtered(x, response):
    """Linear filtering: the spectrum of x times a response of frequency."""
    n = x.shape[-1]
    m = next_fast_len(n + SR // 4)
    return irfft(rfft(x, m) * response(np.fft.rfftfreq(m, 1 / SR)), m)[..., :n]


# Likeness of the two sides of a diffuse sound. Each row: frequency in Hz, left-right likeness from 0 to 1.
SIDE_LIKENESS = [(150, 0.96), (600, 0.87), (1400, 0.47), (4000, 0.25), (14000, 0.17)]


def stereo(pair, spectrum):
    """Interaural coherence: two signals become a coloured left and right of rms 1, most alike in the bass."""
    turn = lambda hz: np.arccos(np.clip(along(SIDE_LIKENESS, hz), -1, 1)) / 2
    weights = lambda hz: amp(along(spectrum, hz)) * [np.cos(turn(hz)), np.sin(turn(hz))]
    mid, side = filtered(pair, weights)
    return unit(np.array([mid + side, mid - side]))


def noise(spectrum, size=N):
    """Spectral shaping: coloured stereo noise of rms 1."""
    return stereo(rng.standard_normal((2, size)), spectrum)


def grains(spectrum, rate, spread_db):
    """Shot noise: a dense patter of tiny impacts of unequal size, about rate a second."""
    levels = amp(spread_db * np.clip(rng.standard_normal(N), -2, 2))
    sizes = (rng.random(N) < rate / SR) * levels
    return stereo(sizes * rng.standard_normal((2, N)), spectrum)


def fade(t, t60):
    """Exponential damping: free decay by 60 dB in t60."""
    return np.exp(-np.log(1000) * t / t60)


def add(track, s, sound):
    """Superposition: mix a sound in at s seconds."""
    part = track[..., round(s * SR):][..., :sound.shape[-1]]
    part += sound[..., :part.shape[-1]]


def ring(hz, width, size):
    """Modal overlap: a narrow band of noise stands for a cluster of close modes round hz."""
    band = lambda f: 1 / (1 + ((f - hz) / (width * hz)) ** 4)  # width is a share of hz
    return unit(filtered(noise(WHITE_SPECTRUM, size=size), band))


def moving_ring(hz, width):
    """Modulated carrier: a cluster of close modes whose centre hz moves from sample to sample."""
    phase = 2 * np.pi * np.cumsum(hz) / SR
    return unit(wobble(width) * np.sin(phase) + wobble(width) * np.cos(phase))


def resonances(modes, f):
    """Damped resonators: the summed response of (Hz, width Hz, dB) modes."""
    return sum(amp(db) * 1j * f * w / (c * c - f * f + 1j * f * w) for c, w, db in modes)


def bubbles(rate, centre_hz, spread, cycles, size_db=4):
    """Volume pulsation: a cloud of small bubbles, each trembling for some cycles at its own pitch and place."""
    count = int(rate * N / SR)
    when, t = rng.integers(0, N, count), np.arange(int(4 * cycles * SR / centre_hz)) / SR
    pitch, size, side = np.clip(rng.standard_normal((count, 3)), -2, 2).T
    phase = np.minimum(centre_hz * np.exp(spread * pitch), SR / 3)[:, None] * t  # in cycles
    envelope = np.exp(-phase / cycles) * (1 - np.exp(-phase / 2)) * (1 - t / t[-1])
    pings = amp(size_db * size)[:, None] * np.sin(2 * np.pi * phase) * envelope
    index = (when[:, None] + np.arange(len(t))).ravel()
    channels = []
    for k in (1, -1):  # left, right
        placed = pings * amp(10.0 * k * side)[:, None]
        channels.append(np.bincount(index, placed.ravel(), N)[:N])
    return unit(np.array(channels))


def chatter(rate, decay, steady):
    """Stick and jolt: contact force of rms 1, a steady share plus uneven jolts, about rate a second."""
    jolts = (rng.random(N) < rate / SR) * rng.uniform(0.36, 1, N)
    return unit(steady + unit(filtered(jolts, lambda f: 1 / (1 + 2j * np.pi * f * decay))))


def strokes(rows, rise, fall):
    """Amplitude envelope: the gain of each (s, length, dB) row rises, holds and dies away."""
    gain, t = np.zeros(N), np.arange(SR) / SR
    for s, length, db in rows:
        add(gain, s, amp(db) * np.clip(t / rise, 0, 1) * np.exp(-np.maximum(t - length, 0) / fall))
    return gain


def scattered(start, end, rate):
    """Jittered timing: uneven moments, about rate a second, each with two random deviations."""
    draws = rng.uniform(-1, 1, (64, 3))
    times = start + (np.arange(len(draws)) + .5 + .4 * draws[:, 0]) / rate
    return [(s, a, b) for s, (_, a, b) in zip(times, draws) if s < end]


def scene():
    """Superposition of sources: the spinner stands a little to the left, and the kitchen answers."""
    spinner = leftward(gears() + basket() + rattles(), share=1)
    knocks = leftward(clacks() + bumps() + ticks(), share=1.0)
    sink, bowl = water(), thuds()
    fast = spinner + knocks + room(amp(-8.5) * spinner + amp(-10.5) * knocks, speed=2.57)
    # fast motion lifts the bass limit too
    fast = filtered(fast, lambda hz: hz ** 4 / (hz ** 4 + 170 ** 4))
    normal = sink + bowl + lettuce() + room(amp(-6.5) * sink + amp(-9.5) * bowl, speed=1.0)
    return fast + normal + background()


TOP_HZ = 16100


def record(dry):
    """Saturation and band limiting: peaks are rounded off, the deepest bass and all above TOP_HZ are lost."""
    limited = dry / (1 + (dry / .9) ** 8) ** (1 / 8)
    return filtered(limited, lambda hz: hz ** 4 / (hz ** 4 + 36 ** 4) * (hz < TOP_HZ))


dry = scene()
out = record(dry)
file_out(out)
```